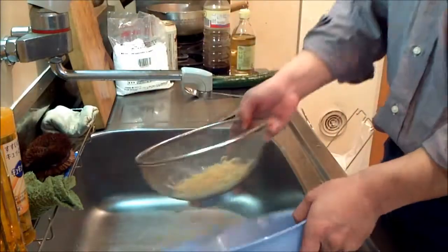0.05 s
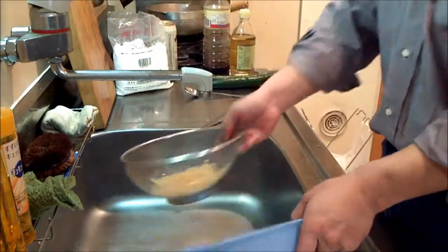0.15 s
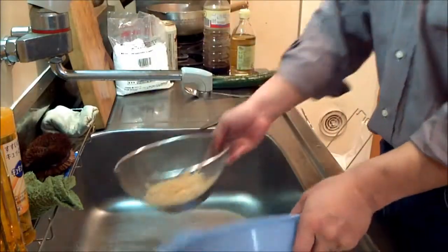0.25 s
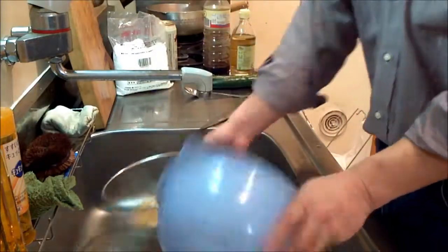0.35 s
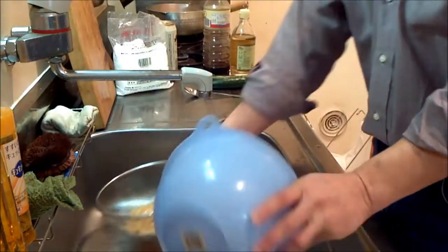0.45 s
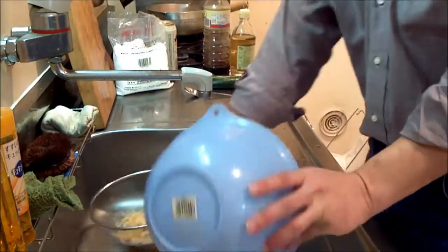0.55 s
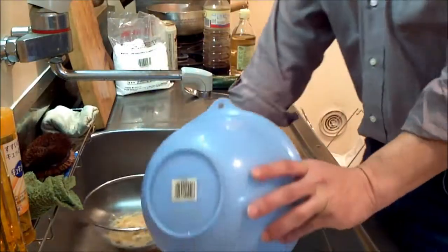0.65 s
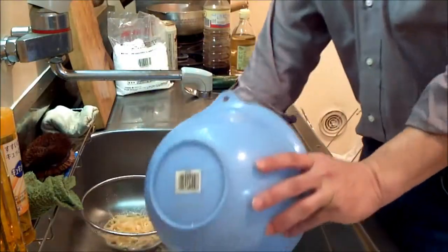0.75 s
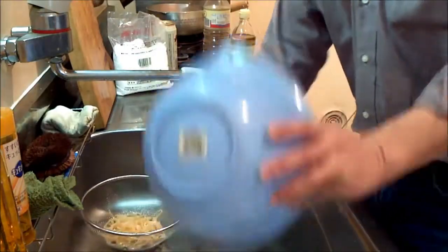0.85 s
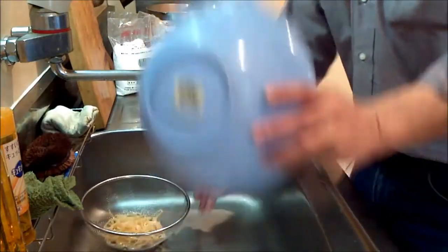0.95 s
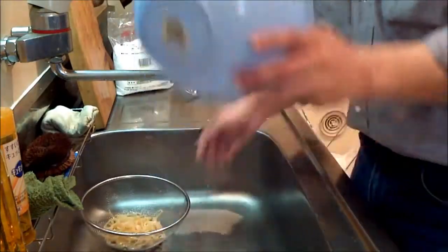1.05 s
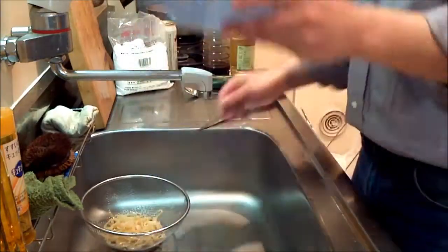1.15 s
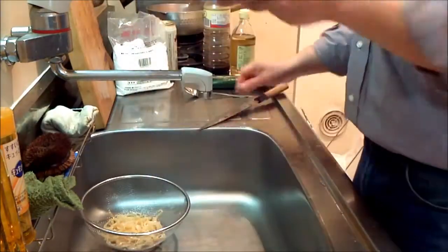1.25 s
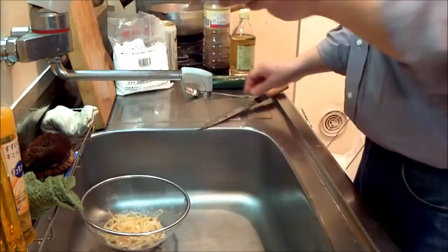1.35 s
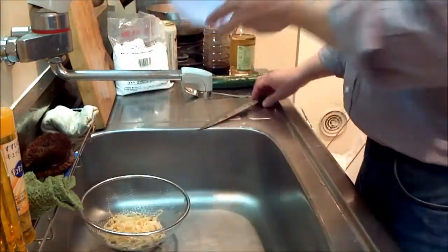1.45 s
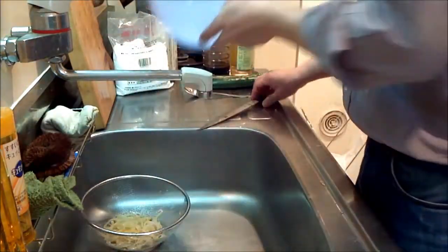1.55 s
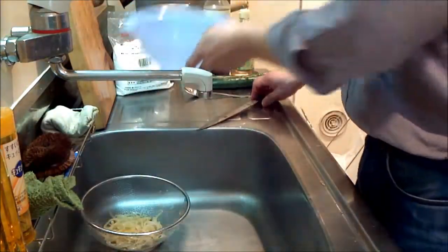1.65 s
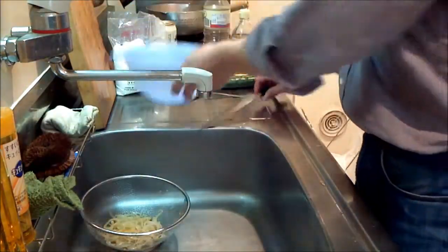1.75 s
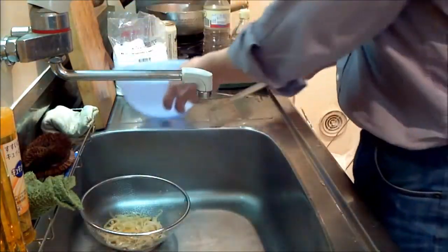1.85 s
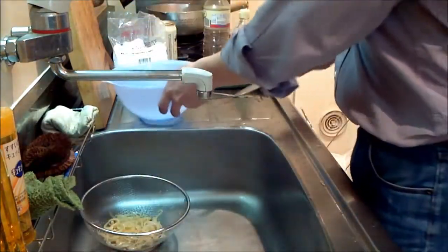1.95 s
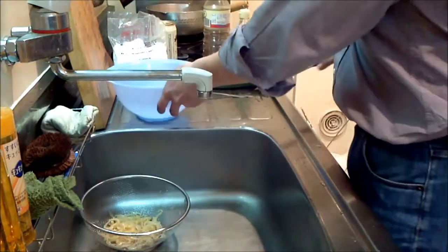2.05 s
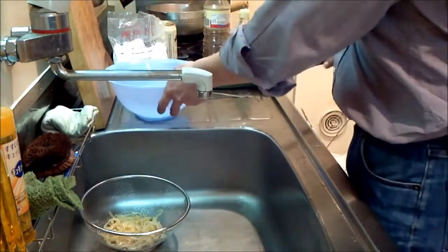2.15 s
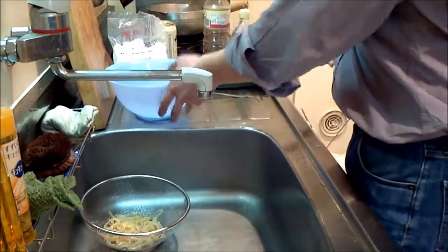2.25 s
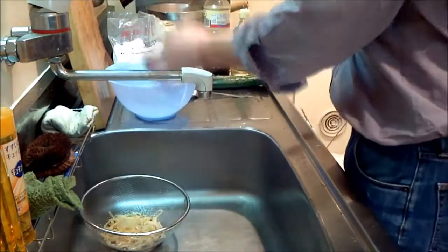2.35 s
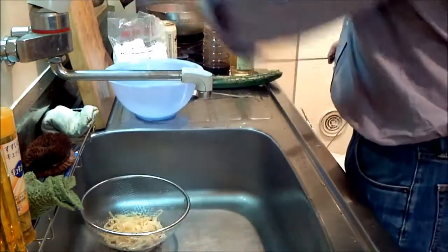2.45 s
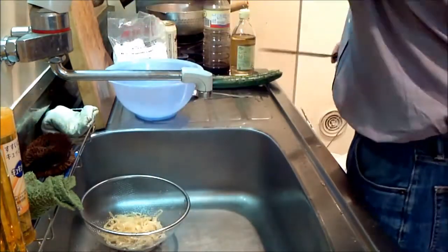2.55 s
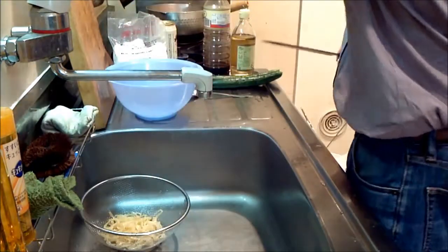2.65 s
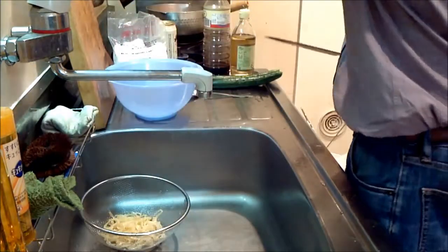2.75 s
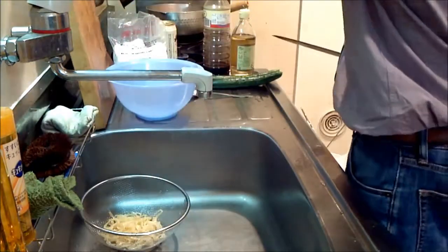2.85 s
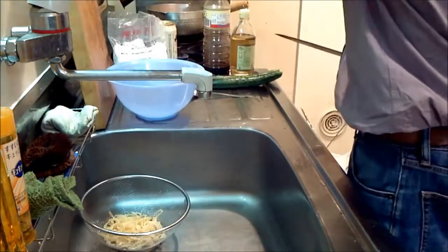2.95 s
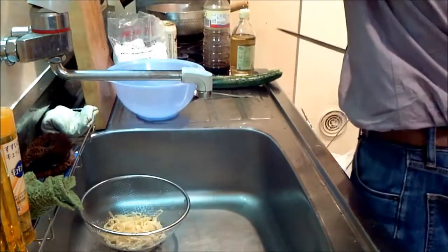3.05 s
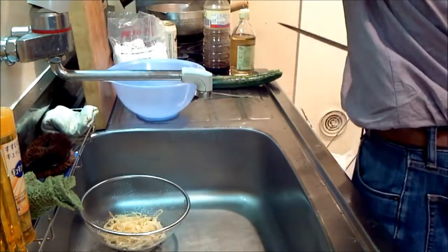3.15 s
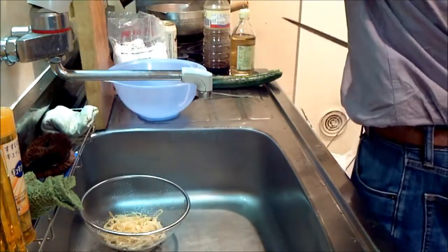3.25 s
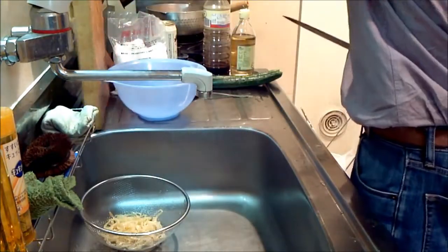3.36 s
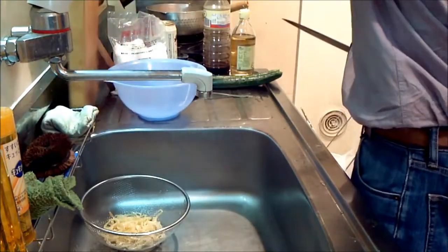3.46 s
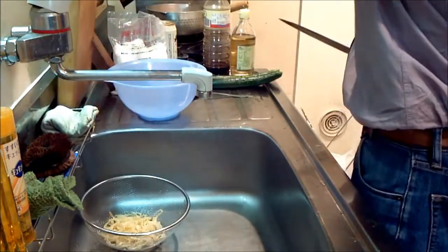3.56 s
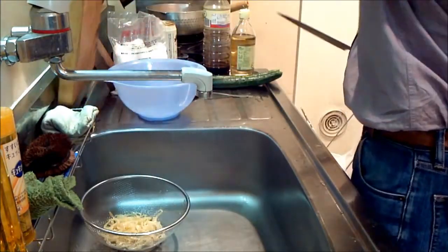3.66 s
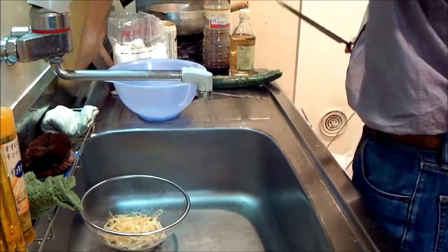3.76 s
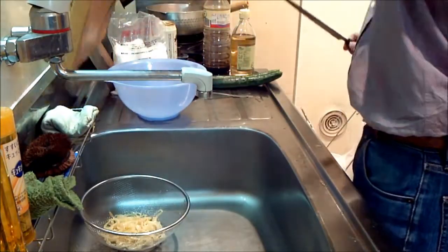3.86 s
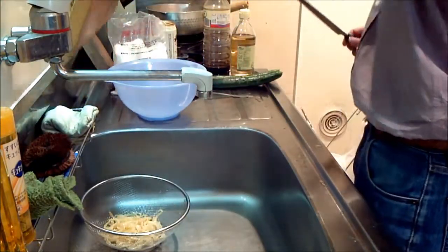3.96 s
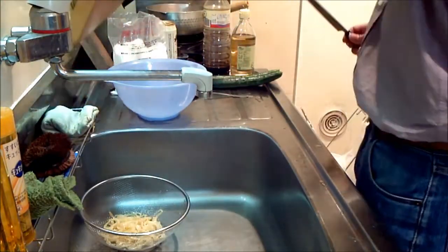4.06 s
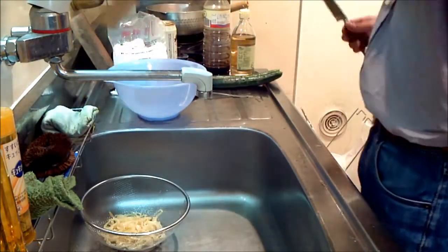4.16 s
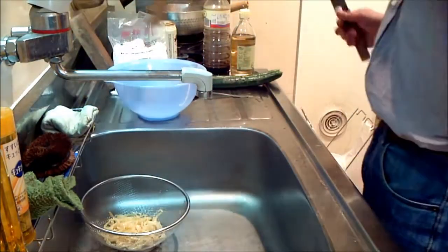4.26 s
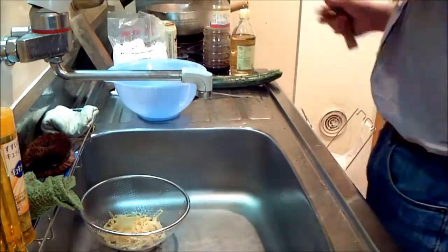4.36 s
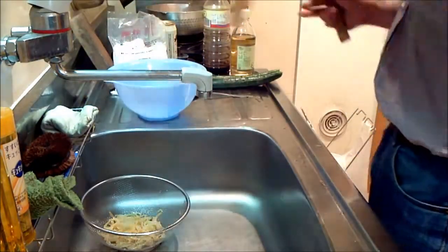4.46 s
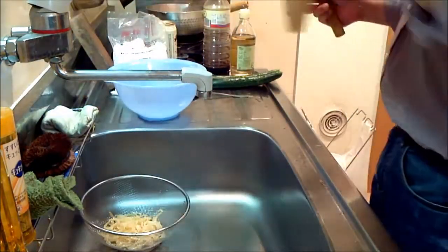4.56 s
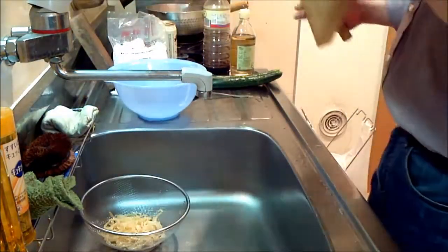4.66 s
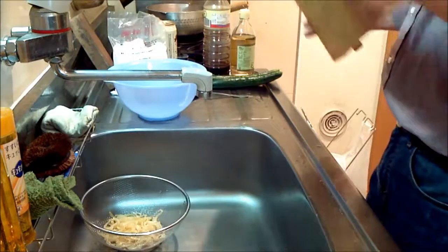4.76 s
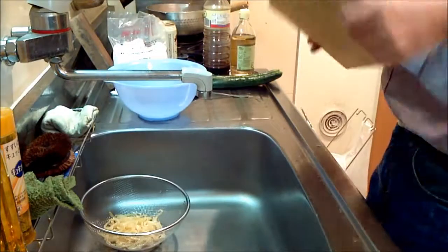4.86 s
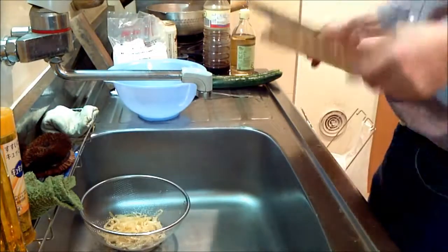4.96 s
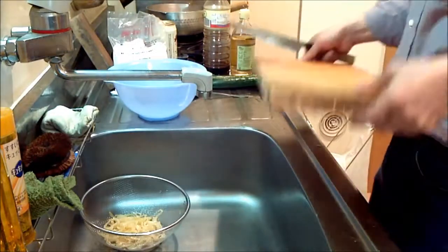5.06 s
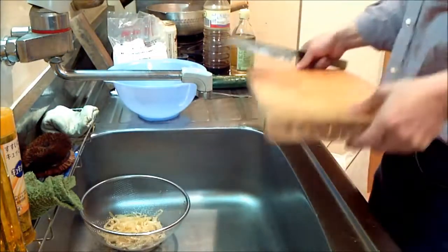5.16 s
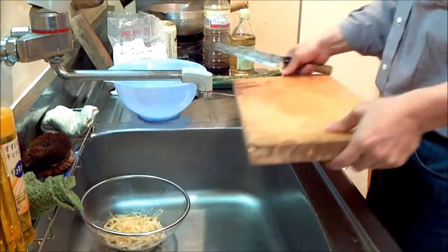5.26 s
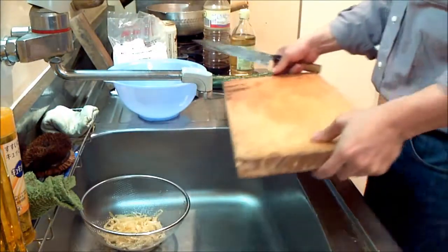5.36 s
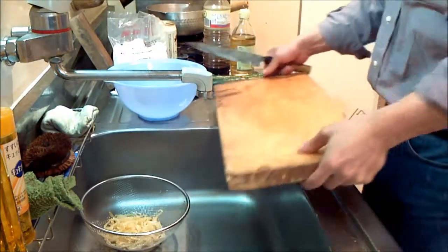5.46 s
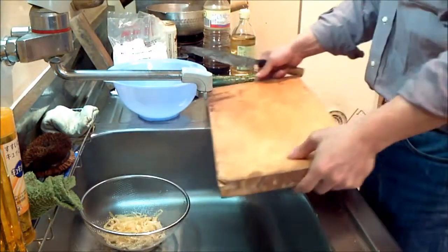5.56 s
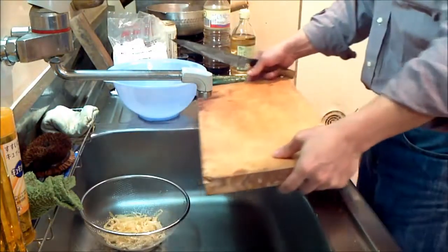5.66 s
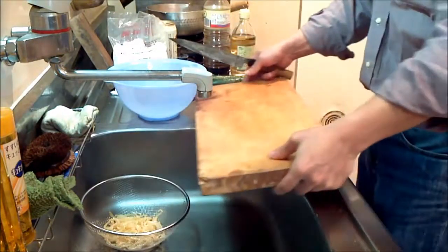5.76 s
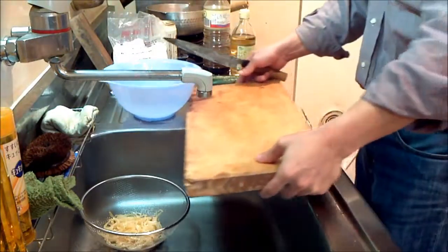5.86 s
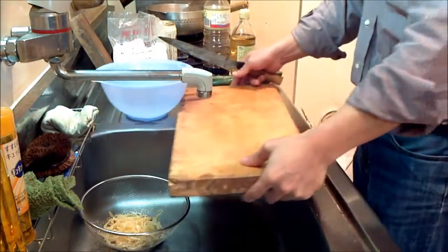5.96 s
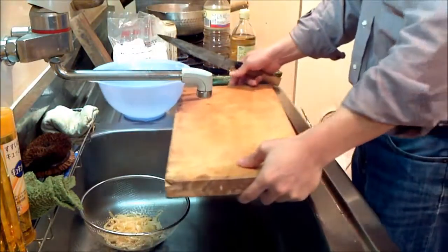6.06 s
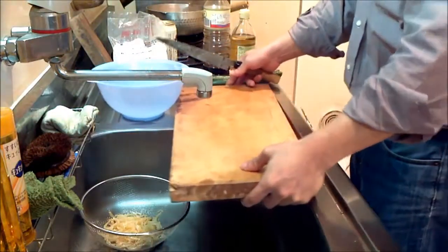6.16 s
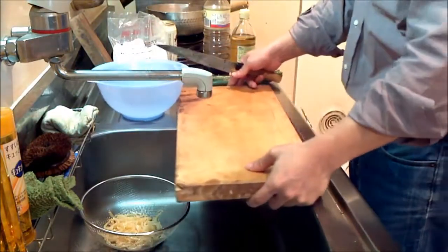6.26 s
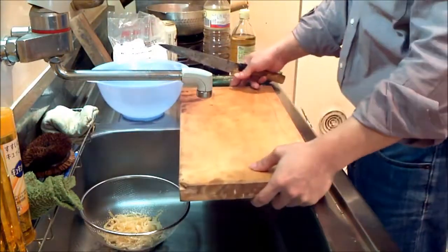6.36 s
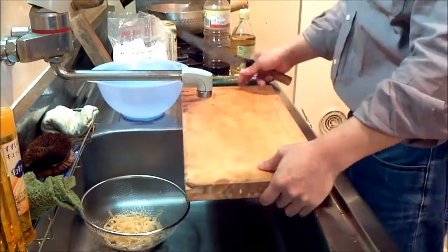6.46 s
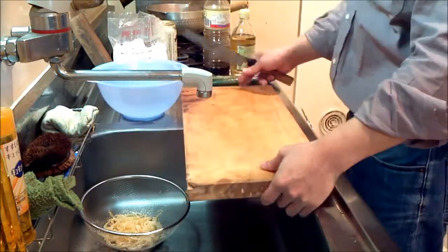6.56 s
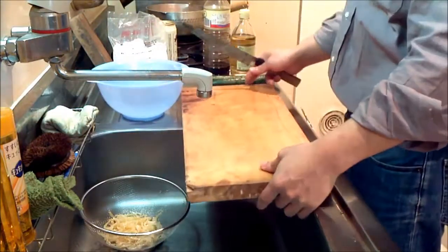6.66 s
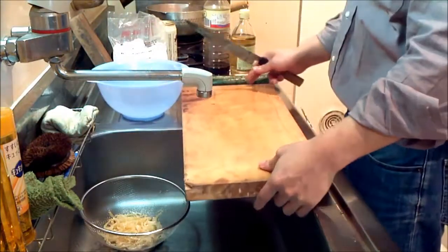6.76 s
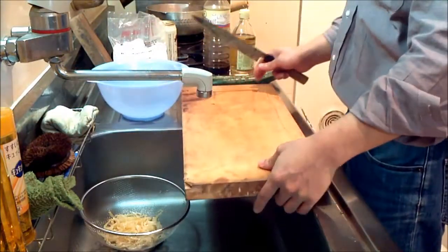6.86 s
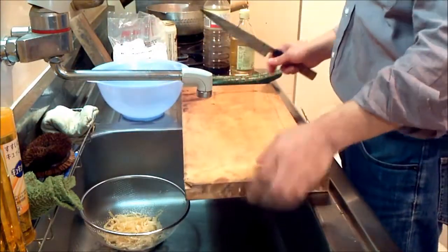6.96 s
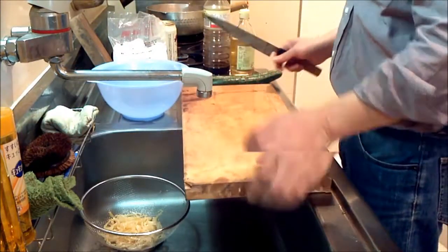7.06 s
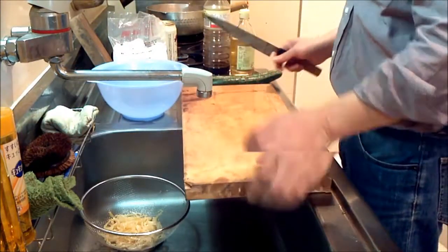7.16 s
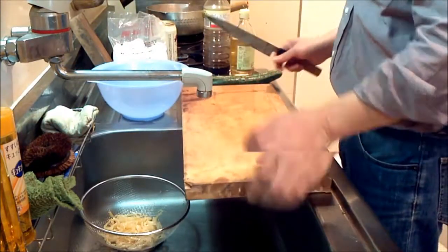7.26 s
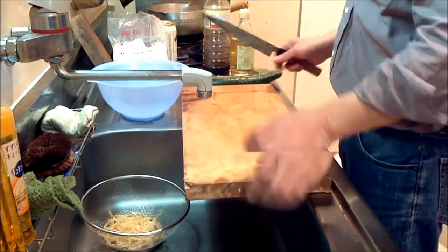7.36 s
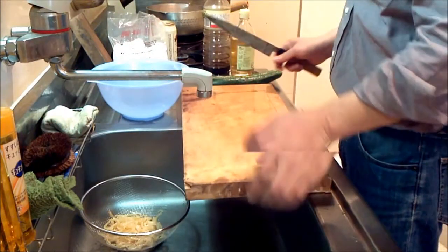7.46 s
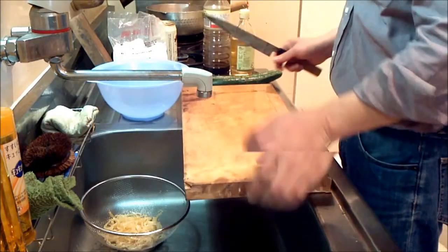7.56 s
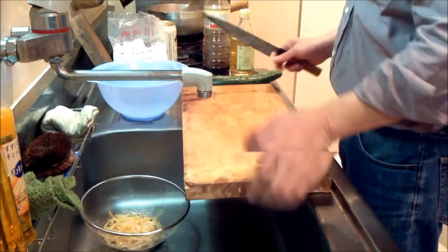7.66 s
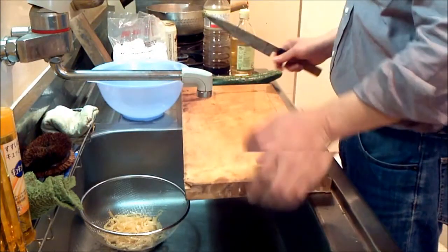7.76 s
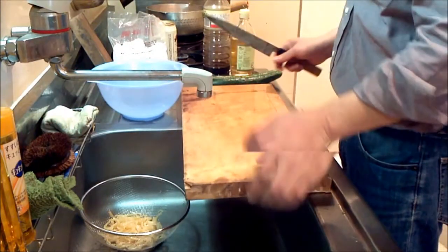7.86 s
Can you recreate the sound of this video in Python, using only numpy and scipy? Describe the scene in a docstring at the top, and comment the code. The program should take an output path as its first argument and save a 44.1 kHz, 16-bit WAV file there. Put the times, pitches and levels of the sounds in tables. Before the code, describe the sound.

A steady, low-mid fan hum runs throughout a small kitchen, captured close with thin bass and no upper treble. Near 0.65-0.9 s a wire strainer lands in the steel sink: a sharp metallic clack and a few quick rattles with short ringing. At 1.6 s a plastic bowl bumps lightly, then at 2.0 s hits the counter with the loudest, hard hollow bang, followed by a faint touch at 2.2 s. Quiet follows, with tiny faint pips and soft brushing. At 3.7 s a wooden board knocks crisply leaving its rack, with small after-taps. Light knife taps come around 4.9-5.1 s. From 5.7 s the board knocks onto the sink rim, scrapes softly until 6.3 s, and settles in low woody thuds until 6.9 s. At about 7.5 s everything drops out momentarily and fades back quickly; a dull, muted thump comes at 7.9 s.

```python
"""A steady fan-like hum runs throughout; over it kitchen ware is set down around a steel sink: a strainer in the basin,
a plastic bowl on the counter, a board pulled from its rack, tapped by a knife and laid over the sink, a last dull thump.
Each knock starts decaying sine modes of the object and narrow noise bands for the dense ringing of steel and small room.
Shaped noise makes the hum, the slide of the board, soft brushes and tiny pips.
There is little deep bass and a steep top cut; near the end the sound drops out briefly and fades back in."""
import sys
import numpy as np
from scipy import signal
from scipy.fft import rfft, irfft
from scipy.io import wavfile

SR = 44100
rng = np.random.default_rng(int(sys.argv[2]) if len(sys.argv) > 2 else 0)


def to_wav(sig):
    """Store sig (one row per channel, or 1-D mono) as 16-bit WAV at the path in sys.argv[1].

    Samples outside -1..1 are clipped; the rate is SR.
    """
    pcm = np.clip(np.atleast_2d(sig), -1, 1) * 32767
    pcm = np.round(pcm).astype(np.int16)
    wavfile.write(sys.argv[1], SR, pcm.T)  # frames by channels


def how_loud(loudness_db):
    """Turn decibels into a plain amplitude multiplier (0 dB gives 1, 20 dB gives 10)."""
    steps = np.asarray(loudness_db, float) / 20
    return 10 ** steps


N = 349272
T = np.arange(N) / SR

# Spectrum shape of the hum: pitch_hz, relative level_db (per Hz)
HUM_SPECTRUM = [(18, -50.5), (30, -21.5), (113, -11.5), (153, 0.5), (293, -11.5), (330, -14.5), (467, -9),
                (603, -12.5), (662, -9.5), (836, -13), (1460, -15), (1800, -15), (1930, -15), (6330, -26.5),
                (7800, -30.5), (10100, -53), (17200, -120)]
# Resonances lifted out of the hum: pitch_hz, width_hz, lift_db
HUM_PEAKS = [(479, 30, 2.5), (680, 30, 2.5), (1438, 110, 4), (3460, 230, 0.5), (5000, 650, -2),
             (6210, 970, 2.5)]
# Faint brushing puffs: centre_s, level_db, length_ms (centre to 1/e), pitch_hz
BRUSHES = [(3.391, -54.5, 42, 1500), (4.165, -51, 25, 6000), (4.91, -52, 16, 5000), (5.05, -51, 67, 5000),
           (5.2, -55.5, 74, 3000), (5.866, -48, 15, 6000), (6.97, -58, 20, 5000), (7.441, -50.5, 21, 3000),
           (7.765, -55, 23, 5000)]
# Faint short pips: centre_s, level_db
PIPS = [(2.437, -52.5), (3.057, -60), (3.322, -59), (3.352, -58), (4.015, -60), (4.1, -54), (4.277, -59),
        (4.365, -57)]
# Resonances of wood sliding on steel: pitch_hz, width_hz, relative level_db
SLIDE_PEAKS = [(500, 840, -2), (2390, 930, 0), (3400, 750, -12), (5500, 2300, -4.5)]

# Blows on each object: start_s, thud_db (210 Hz and below), body_db (420-900 Hz), crack_db (4 kHz and up),
# ring_share (multiplies the free decay times)
STRAINER_KNOCKS = [(.418, -70, -55.5, -55, 0.98), (.6555, -27, -27.5, -33.5, 0.63),
                   (.706, -29.5, -44.5, -68, 0.59), (.745, -28, -53, -66, 0.24), (.758, -52, -39, -44.5, 1),
                   (.860, -42, -36.5, -42.5, 0.68)]
BOWL_KNOCKS = [(1.535, -52, -49, -52.5, .5), (1.588, -26, -31, -37.5, 0.67), (1.62, -24.5, -34, -40, 0.57),
               (2.0142, -16, -15.5, -23, 0.095), (2.017, -16.5, -19.5, -26, 0.93),
               (2.220, -39, -40, -56.5, 1.47), (2.395, -56, -70, -58, .6)]
RACK_KNOCKS = [(2.99, -51, -55, -81, 2.1), (3.6835, -26, -25, -27, 0.57), (3.812, -49, -42, -53, .3),
               (3.820, -34, -37, -58, 0.47), (3.848, -48, -52, -79, 0.64), (3.953, -39.5, -56, -80, 0.38),
               (4.355, -58, -59, -58, 0.47), (4.751, -62, -44.5, -86, 0.37)]
KNIFE_KNOCKS = [(4.937, -39, -38.5, -50.5, 0.96), (5.028, -32, -46.5, -53, .5),
                (5.085, -37, -74, -67, 1.05)]
BOARD_KNOCKS = [(5.672, -23, -31.5, -46, 0.59), (5.681, -20, -28, -33, 0.17),
                (5.688, -29.5, -24, -29, 0.69), (5.900, -32.5, -38.5, -47.5, 1),
                (5.936, -21.5, -41, -57, 0.38), (5.958, -35, -47, -52, 0.52), (6.270, -17, -43, -57, 0.56),
                (6.284, -33, -40, -40.5, 0.97), (6.330, -22, -34, -84, 0.98),
                (6.590, -63, -49.5, -49.5, 0.8), (6.763, -22.5, -48, -65, 0.7), (6.82, -44, -55, -68, 0.31),
                (6.865, -46, -49, -63, 0.93)]
THUMP_KNOCKS = [(7.866, -26, -39, -53, 0.42)]

# Modes each object rings with on its support: pitch_hz, relative level_db, free t60_s
STRAINER_MODES = [(93, -15, 0.3), (144.7, 5, 0.44), (171.7, 4, 0.94), (292, -4, 0.5), (421, -6, 0.43),
                  (489, -2.5, 0.32), (613, -5, 0.2), (693, -7, 0.32), (1136, -9, 0.46), (1330, -6.5, 0.25),
                  (1500, -12.5, 0.49), (1750, -9, .3), (2000, -23, .3), (2540, -17, 0.31)]
BOWL_MODES = [(140.6, -14, 0.19), (168, -7.5, 0.65), (202, 3, 0.19), (268, -4, 0.37), (292.7, -5, 0.18),
              (435.6, -2.5, 0.43), (467.5, -3.5, 0.48), (597, 1, 0.12), (673, -5.5, 0.45), (775, -6, 0.26),
              (832, -16, 0.79), (933, -16, 0.35), (1040, -12, 0.36), (1327, -13, 0.35), (1423, -11.5, 0.38),
              (2100, -11, 0.21), (2190, -12, 0.07), (2410, -9.5, .25), (2710, -12, 0.16), (2870, -17, 0.34),
              (3150, -15, 0.49), (6240, -14, 0.33)]
RACK_MODES = [(145.5, 0, 0.83), (173, -3.5, 0.88), (258.1, -4.5, 0.72), (529, -3, 0.58), (572, -6.5, 1),
              (618, -17, 0.6), (709, -5.5, .35), (778, -7.5, 0.79), (885, -24, 0.15), (1070, -2.5, .2),
              (1330, -19, .2), (1520, -17.5, 0.22), (1864, -2.5, 0.18), (1970, -3, 0.11), (2300, -12, .2),
              (2370, -6, 0.17), (2540, -0.5, .2), (2770, -5.5, 0.18)]
KNIFE_MODES = [(185, -5, .4), (336, -8, .3), (676, -4, .36), (838, -8, .4), (2525, -1, .6), (2565, -4, .5),
               (2608, -2, .9), (2700, -3, .7), (2810, 0, .2), (4910, -13, .5), (5030, -9, .4),
               (5391, -4, .35), (5465, -3, .7), (5614, -1, .3), (5750, -3, .15)]
BOARD_MODES = [(121.4, -12, 0.2), (153.8, 4.5, 0.17), (195.5, -9.5, 0.26), (255.5, -12.5, 0.37),
               (290, -10.5, 0.54), (373, -6.5, 0.21), (427.5, -1, 0.52), (464, -14.5, 0.34),
               (514, 1.5, 0.2), (557, -7, 0.53), (659.5, 2, 0.22), (740, -23.5, 0.13), (794, -16, 0.18),
               (940, -16, 0.22), (1056, -22.5, 0.53), (1915, -8.5, .16), (2300, -17, .19), (2284, -5, 0.2),
               (2463, -6, 0.21), (5870, -9, 0.25)]
THUMP_MODES = [(140, -41, 0.13), (191, -2.5, 0.4), (249, 4.5, 0.1), (362, 6.5, 0.18), (774, -1, 0.28),
               (905, 0, 0.17)]

# Dense ringing of sheet steel and room: pitch_hz, relative level_db, free t60_s
STEEL_RINGING = [(60.3, -26.5, 0.41), (99, -34.5, 0.28), (147, -12, 0.52), (293, -18, 0.49),
                 (685, -11, 0.43), (1500, -8, 0.39), (2460, -5, 0.34), (4000, -5.5, 0.31),
                 (6000, -6.5, 0.3), (8600, -12, 0.18)]
# How strongly each object shakes the steel: level_db at 80, 350, 1500, 2600 and 7000 Hz
STRAINER_SHAKE = (0, 0, -1, 0, 0)
BOWL_SHAKE = (-9.5, 4, -3.5, -1, 0.5)
RACK_SHAKE = (3.5, 5.5, 3.5, 4, -11.5)
KNIFE_SHAKE = (-8, 3, -3, -4, 2)
BOARD_SHAKE = (-8, 5, -1.5, -0.5, -0.5)
THUMP_SHAKE = (-13, 14.5, -5.5, -11, 1)

# Steep top cut, as from a low sample rate: pitch_hz, level_db
TOP_CUT = [(6800, -0.5), (7200, -2), (7600, -16), (7900, -22.5), (8200, -65.5), (8500, -90)]

PATCHY_DB = 2.5  # rms flicker of narrow noise bands
HUM_DB, HUM_WAVER_DB, HUM_WAVER_HZ = -49.5, 0.6, 1.1  # level, rms and speed of its slow wavering
PIP_HZ, PIP_WIDTH_HZ, PIP_MS = 3570, 110, 13  # length from centre to 1/e
SLIDE_FROM_S, SLIDE_TO_S, SLIDE_DB, SLIDE_RISE_S, SLIDE_FALL_S = 5.88, 6.29, -51.5, 0.19, 0.14
# Random wavering roughens the modes: rms from 2500 Hz up, less below
WOBBLE_DB, WOBBLE_HZ = 5.5, 40
# Chatter at a ring_share of 1: length at a crack of 0 dB, change per dB of crack, shortest length
CHATTER_MS, CHATTER_MS_PER_DB, CHATTER_LEAST_MS = 81.7, 1.02, 10
SOFT_MS_PER_DB = 0.07  # a soft blow pushes longer: per dB of thud over crack
LOW_CUT_HZ = 93.5
GAP_FROM_S, GAP_TO_S, GAP_BACK_S, GAP_DB = 7.474, 7.503, .02, -38  # BACK is the fade-in time constant


def on_log(hz, at_hz, values):
    """Values joined by straight lines on a log-frequency axis."""
    return np.interp(np.log(hz), np.log(at_hz), values)


def band(hz, width, noise):
    """One bell-shaped resonance band of a noise spectrum, rms 1."""
    f = np.fft.rfftfreq(N, 1 / SR)
    x = irfft(noise * np.exp(-((f - hz) / width) ** 2), N)
    return x / x.std()


def swell(centre_s, length_ms):
    """A bell-shaped loudness curve that rises and falls smoothly around its centre."""
    return np.exp(-((T - centre_s) * 1000 / length_ms) ** 2)


def patchy():
    """White noise whose narrow bands each flicker in level on their own, from one short frame to the next."""
    cells = signal.stft(rng.standard_normal(N), nperseg=1024)[2]
    flicker = how_loud(PATCHY_DB * rng.standard_normal(cells.shape))
    return signal.istft(cells * flicker, nperseg=1024)[1][:N]


def hum():
    """Steady air and machine noise coloured by the small room, wavering slowly."""
    f = np.fft.rfftfreq(N, 1 / SR) + 1
    colour_db = on_log(f, *np.transpose(HUM_SPECTRUM))
    for hz, width, lift_db in HUM_PEAKS:
        colour_db = colour_db + lift_db * np.exp(-((f - hz) / width) ** 2)
    noise = irfft(rfft(patchy()) * how_loud(colour_db), N)
    waver = band(0, HUM_WAVER_HZ, rfft(rng.standard_normal(N)))
    level = how_loud(HUM_DB + HUM_WAVER_DB * (waver - waver.mean()))
    return level * noise / noise.std()


def brushes():
    """Soft puffs of broad noise."""
    noise = rfft(rng.standard_normal(N))
    return sum(how_loud(db) * band(hz, 0.96 * hz, noise) * swell(s, ms) for s, db, ms, hz in BRUSHES)


def pips():
    """Tiny high blips, short swells of one narrow noise band."""
    tone = band(PIP_HZ, PIP_WIDTH_HZ, rfft(rng.standard_normal(N)))
    return tone * sum(how_loud(db) * swell(s, PIP_MS) for s, db in PIPS)


def slide():
    """Wood dragged over the steel rim: a hiss in broad resonances that builds up, holds and dies away."""
    noise = rfft(patchy())
    rise = (T - SLIDE_FROM_S) / SLIDE_RISE_S
    fall = (SLIDE_TO_S - T) / SLIDE_FALL_S
    push = np.clip(np.minimum(rise, fall), 0, 1)
    hiss = sum(how_loud(db) * band(hz, width, noise) for hz, width, db in SLIDE_PEAKS)
    return how_loud(SLIDE_DB) * push * hiss


def add(out, s, sound):
    """Mix a short sound in at time s."""
    i = int(s * SR)
    out[i:i + len(sound)] += sound[:N - i]


def fade(t, rise, hold, t60):
    """Builds up, is held while the parts chatter, then dies away."""
    build_up = 1 - np.exp(-t / rise)
    return build_up * np.exp(-np.log(1000) * (np.hypot(t, hold) - hold) / t60)


def ring_modes(out, s, modes, colour, ring, hold, push, wobble):
    """One blow starts all the object's modes together, as decaying sines whose strength wavers."""
    for k, (hz, db, t60) in enumerate(modes):
        t = T[:int(SR * min(hold + .7 * ring * t60, .5))]
        # each mode reads its own stretch of the wobble
        start = (int(s * SR) + k * SR // 3) % (N - SR)
        waver_db = WOBBLE_DB * min(hz / 2500, 1) * wobble[start:start + len(t)]
        level = how_loud(db + waver_db + on_log(hz, *colour))
        envelope = fade(t, 0.66 / hz + 0.16 * hold + push, 0.81 * hold + push, ring * t60)
        # neighbouring modes start in opposite directions, so close pairs swell before they beat
        add(out, s, (-1) ** k * level * np.sin(2 * np.pi * hz * t) * envelope)


def ring_steel(out, s, bands, colour, ring, hold, push):
    """The blow shakes sheet steel and room, whose modes lie so dense that they ring as bands of noise."""
    for hz, db, t60, noise in bands:
        piece = noise[int(s * SR):int(SR * (s + min(hold + .7 * ring * t60, .5)))]
        # low bands take longer to fill
        envelope = fade(T[:len(piece)], 1.2 / hz + 0.16 * hold + push, hold + push, ring * t60)
        add(out, s, how_loud(db + on_log(hz, *colour)) * piece * envelope)


def knocks(rows, modes, shake_db, steel_hz, steel):
    """Every blow rings object and steel; a harder crack and a freer object chatter longer."""
    out = np.zeros(N)
    at_hz, ringing_db, ringing_t60 = np.transpose(STEEL_RINGING)
    steel_db = on_log(steel_hz, [80, 350, 1500, 2600, 7000], shake_db) + on_log(steel_hz, at_hz, ringing_db)
    steel_t60 = on_log(steel_hz, at_hz, ringing_t60)
    wobble = band(0, WOBBLE_HZ, rfft(rng.standard_normal(N)))
    for s, thud_db, body_db, crack_db, ring in rows:
        hold = ring * max(CHATTER_MS + CHATTER_MS_PER_DB * crack_db, CHATTER_LEAST_MS) / 1000
        push = SOFT_MS_PER_DB * max(thud_db - crack_db, 0) / 1000
        colour = ([210, 420, 900, 4000], [thud_db, body_db, body_db, crack_db])
        ring_modes(out, s, modes, colour, ring, hold, push, wobble)
        ring_steel(out, s, zip(steel_hz, steel_db, steel_t60, steel), colour, ring, hold, push)
    return out


def scene():
    """All knocks, sharing one set of steel bands, over the quiet sounds."""
    steel_hz = 30 * 2 ** np.arange(0, 8.2, .4)
    noise = rfft(patchy())
    steel = [band(hz, hz / 5, noise) for hz in steel_hz]
    things = [(STRAINER_KNOCKS, STRAINER_MODES, STRAINER_SHAKE),
              (BOWL_KNOCKS, BOWL_MODES, BOWL_SHAKE),
              (RACK_KNOCKS, RACK_MODES, RACK_SHAKE),
              (KNIFE_KNOCKS, KNIFE_MODES, KNIFE_SHAKE),
              (BOARD_KNOCKS, BOARD_MODES, BOARD_SHAKE),
              (THUMP_KNOCKS, THUMP_MODES, THUMP_SHAKE)]
    hits = sum(knocks(*thing, steel_hz, steel) for thing in things)
    return (hum() + brushes() + pips() + slide() + hits)[None]


def roll_off(x):
    """The treble ends steeply here."""
    return signal.sosfilt(signal.butter(12, 8180, fs=SR, output="sos"), x)


def record(dry):
    """Little deep bass, a steep cut near 7.5 kHz as from a low sample rate, and a short gap in the sound."""
    low_cut = signal.butter(2, LOW_CUT_HZ, "high", fs=SR, output="sos")
    x = signal.sosfilt(low_cut, dry)
    top_db = on_log(np.fft.rfftfreq(N, 1 / SR) + 1, *np.transpose(TOP_CUT))
    x = irfft(rfft(x) * how_loud(top_db), N)
    # the sound drops to a faint floor, then fades back in
    back = 1 - np.exp(-np.maximum(T - GAP_TO_S, 0) / GAP_BACK_S)
    gap = np.where(T < GAP_FROM_S, 1, np.maximum(back, how_loud(GAP_DB)))
    return roll_off(x * gap)


dry = scene()
out = record(dry)
to_wav(out)
```